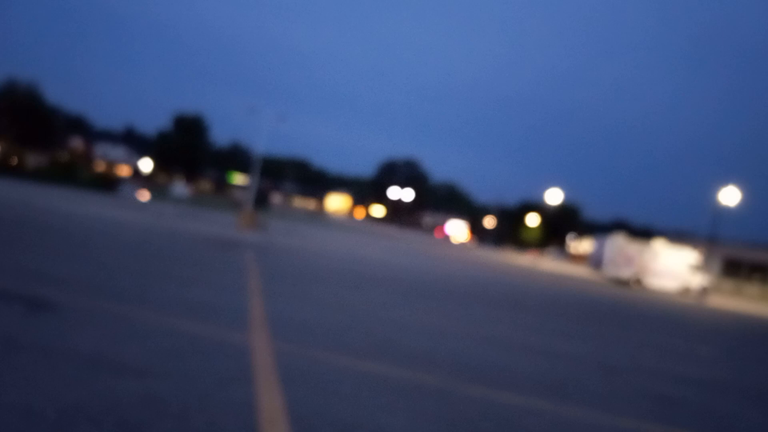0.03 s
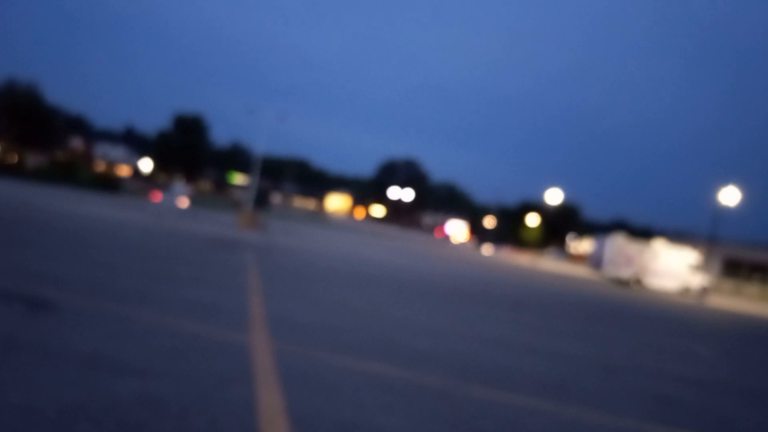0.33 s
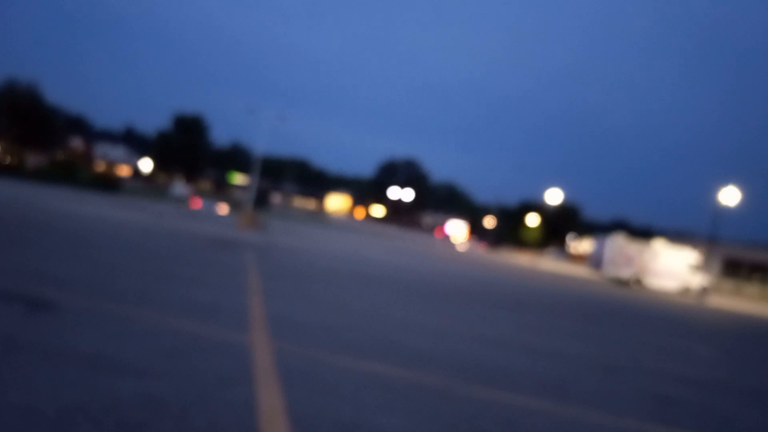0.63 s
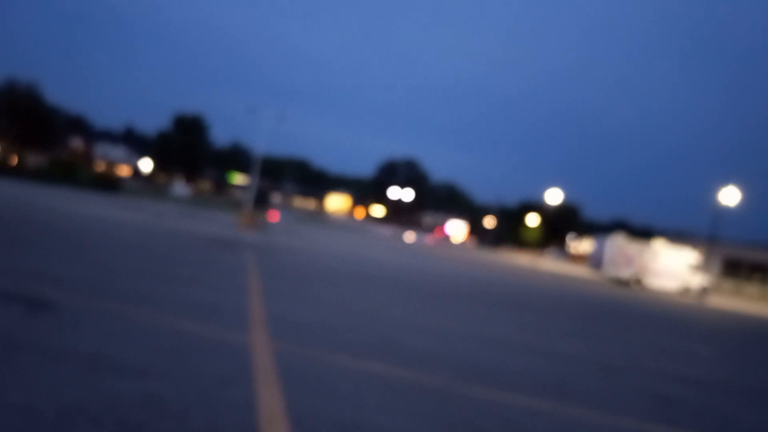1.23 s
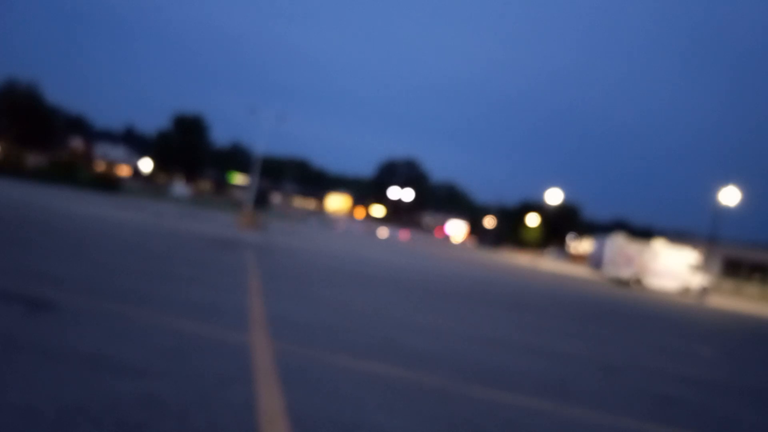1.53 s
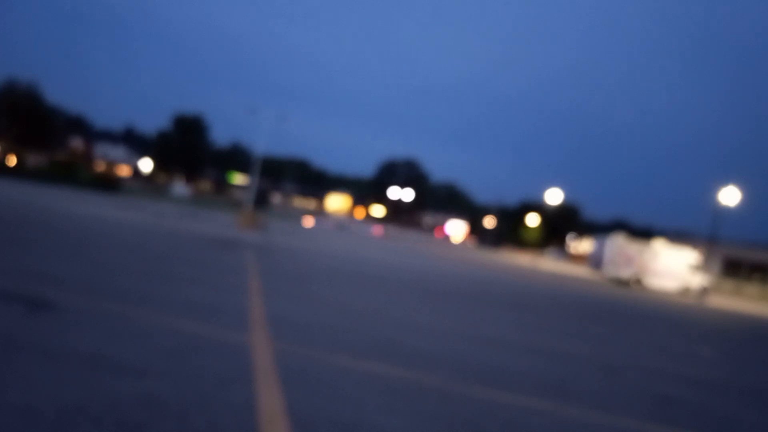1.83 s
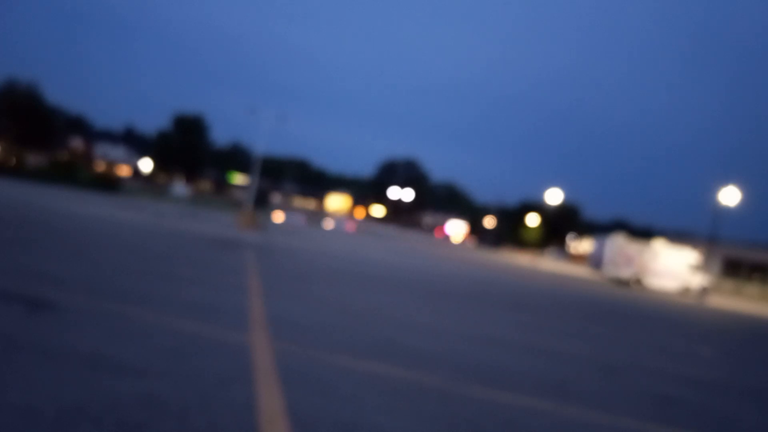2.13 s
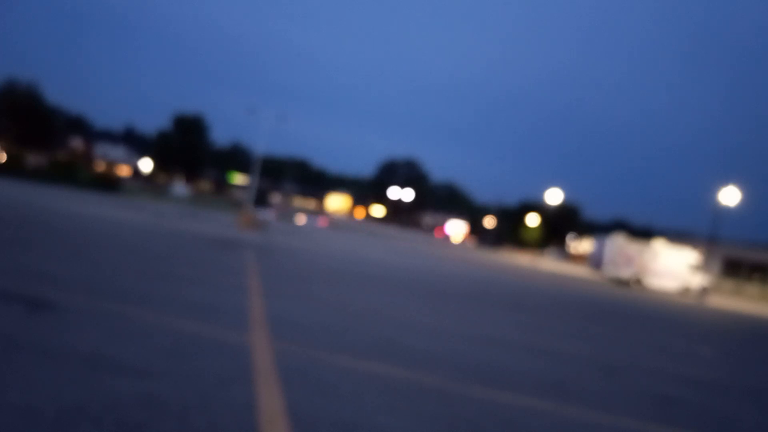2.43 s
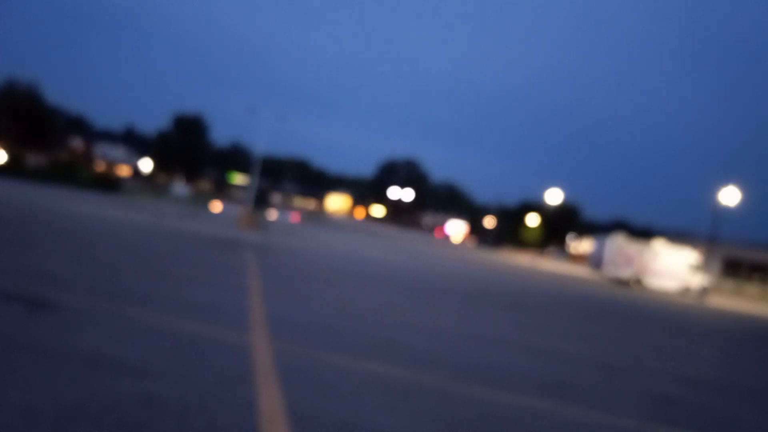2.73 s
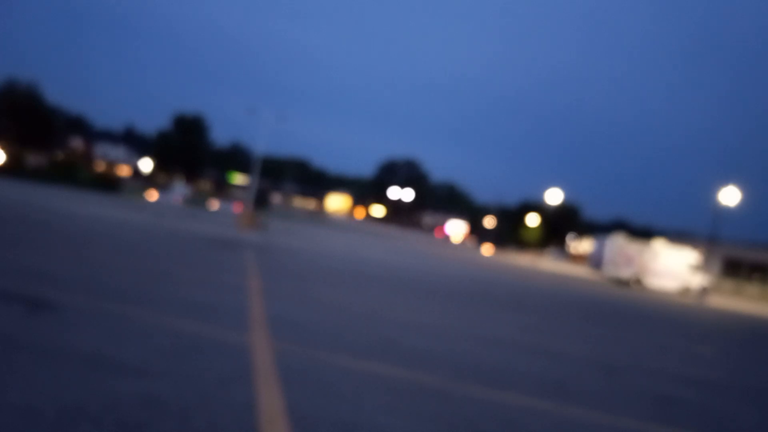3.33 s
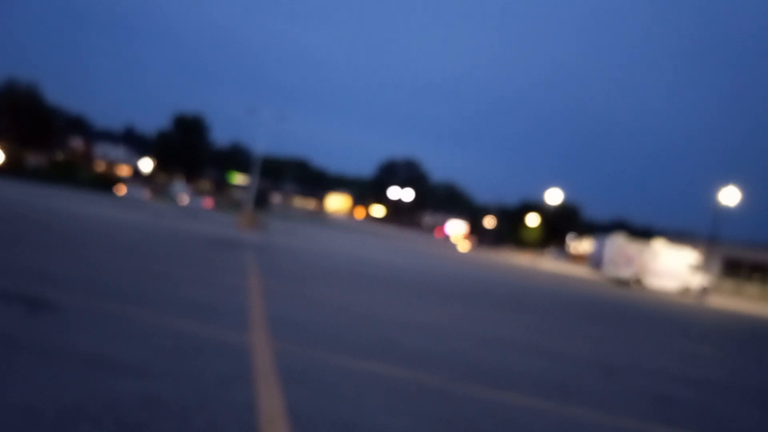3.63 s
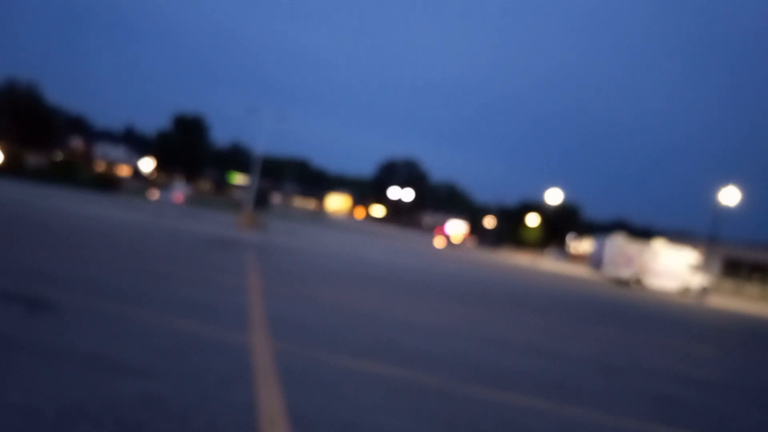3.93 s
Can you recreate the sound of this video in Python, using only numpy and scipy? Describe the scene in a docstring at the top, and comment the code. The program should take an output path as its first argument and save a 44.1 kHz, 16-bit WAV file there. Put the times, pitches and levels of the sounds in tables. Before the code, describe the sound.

An air horn sounds across a wide car park. At first there is only faint distant traffic and microphone hiss. At about 2.5 seconds the horn starts a held four-note chord, slightly sharp before settling, with rushing air and dull sputtering pops. At about 3.6 seconds it jumps abruptly louder and steadier, holding until the end at around 4 seconds. Nearly everything is in the left channel.

```python
"""Air horn across a car park

Dusk, a wide car park: faint far traffic under the microphone's hiss, then a four-bell air horn from across
the way. Air drives a diaphragm in each bell; the chord starts slightly sharp, settles and sputters. Then
its sound steps up abruptly, as at an edit or gain jump. Nearly everything arrives in the left channel."""
import sys
import numpy as np
from scipy import signal
from scipy.fft import rfft, irfft
from scipy.io import wavfile
from scipy.ndimage import uniform_filter1d, minimum_filter1d

SR = 44100
rng = np.random.default_rng(int(sys.argv[2]) if len(sys.argv) > 2 else 0)


def master(y):
    """Save y as 16-bit WAV."""
    cut = np.clip(np.atleast_2d(y).T, -1, 1)
    pcm = np.round(cut * 32767)  # scale
    wavfile.write(sys.argv[1], SR, pcm.astype(np.int16))


N = 176400

VALVE_OPEN_S, STEP_UP_S = 2.499, 3.5775   # the quiet part lies between these, the loud part follows
TOP_CUT_HZ = 15700

# Spectrum of the far traffic: f/Hz, density/(dB per Hz)
TRAFFIC_SPECTRUM = [(30, -128), (60, -129), (95, -107), (220, -118), (290, -92), (430, -91.5), (600, -103),
                    (900, -108), (1300, -113), (2800, -115)]
# Swell and ebb of that traffic: t/s, level/dB (-75 is unity gain)
TRAFFIC_SWELL = [(0.06, -82.5), (0.28, -82), (0.43, -70), (0.74, -78), (0.88, -71.5), (1.06, -79),
                 (1.32, -73.5), (1.58, -81), (1.86, -76), (1.98, -79), (2.08, -77), (2.45, -77.5)]
# Microphone hiss: f/Hz, density/(dB per Hz)
MIC_HISS = [(3000, -114), (3800, -100), (6500, -100), (7400, -102), (8800, -101), (9800, -105),
            (12500, -105), (15400, -110)]
# Rumble in the right channel: f/Hz, density/(dB per Hz)
RIGHT_RUMBLE = [(30, -118), (55, -104), (80, -98), (120, -106), (220, -118), (1000, -128)]
# The four bells: quiet f/Hz, loud f/Hz, quiet level/dB relative to loud, wander/fraction of pitch
HORN_BELLS = [(275.9, 275.1, -20.5, 0.000492), (319.8, 320.05, -17, .0005), (378.4, 378.4, -15, .0007),
              (489.3, 492.3, -13.5, .0013)]
# Harmonics in the loud part: harmonic number, then level/dB for each of the four bells
BELL_HARMONICS = [(1, -22.5, -11, -11.5, -12.5), (2, -37, -13, -19.5, -34.5), (3, -28.5, -37, -42.5, -53),
                  (4, -37.5, -42.5, -37.5, -55), (5, -38.5, -42.5, -42.5, -58), (6, -50, -43, -46, -56),
                  (7, -42, -45.5, -43, -63), (8, -45, -42.5, -49, -65), (9, -51, -40, -46.5, -74),
                  (10, -37, -42, -46, -51.5), (11, -32, -42.5, -55, -75), (12, -37.5, -40.5, -47.5, -70),
                  (13, -39, -42.5, -50, -65), (14, -42.5, -64, -49.5, -75), (15, -52, -47, -52, -74),
                  (16, -64, -47.5, -51, -58), (17, -49.5, -60, -75, -74), (18, -68, -52, -67, -74)]
# Where each bell's roll-off starts, beyond the listed harmonics: level/dB
ROLLOFF_START_DB = [-65, -53.5, -65.5, -78]
# Weak tones beside the chord: f/Hz, loud level/dB, quiet level/dB relative to loud
FAINT_TONES = [(132.6, -43, -6), (191.0, -46, -4), (435.0, -30, -15), (549.5, -38, -5), (710.8, -39, -15)]
# Air rushing through the bells: f/Hz, quiet density/(dB per Hz), loud density/(dB per Hz)
AIR_SPECTRA = [(30, -98, -84), (81, -76, -58.5), (206, -73, -62), (290, -63.5, -48), (436, -57, -48),
               (590, -68.5, -51), (847, -66, -61.5), (1190, -82, -74), (1600, -78.5, -70), (2130, -88, -78),
               (2620, -82, -71.5), (3020, -79, -67), (4200, -88, -78.5), (5030, -87.5, -75),
               (5950, -90, -82.5), (7100, -92.5, -84.5), (8400, -88.5, -78.5), (9800, -99, -94.5),
               (11000, -95.5, -86), (12900, -94, -85), (15800, -103, -95)]
# The strongest pops of the sputter: t/s, peak level/dB
STRONG_POPS = [(2.535, -24), (2.551, -30), (2.572, -23), (2.635, -27), (2.673, -12), (2.78, -19),
               (2.883, -24), (3.084, -15), (3.116, -18.5), (3.148, -16.5), (3.799, -8.5), (3.835, -10)]
# Swell and ebb of the horn's treble: t/s, gain/dB
TREBLE_SWELL = [(2.55, -2), (2.7, -.5), (2.97, 1.5), (3.1, 0.5), (3.3, -1), (3.57, -2), (3.6, -1.5),
                (3.72, 0.5), (3.86, 1.5), (4.0, -.5)]


def from_db(db):
    return 10 ** (np.asarray(db) / 20)


def unit_rms(x):
    return x / np.sqrt(np.mean(x ** 2) + 1e-20)


def seconds():
    return np.arange(N) / SR


def ramp(start_s, length_s):
    """Rises from 0 to 1 and stays."""
    return np.clip((seconds() - start_s) / length_s, 0, 1)


def blend(quiet, loud, step_up):
    """The quiet value at step_up = 0, the loud value at step_up = 1."""
    return quiet + (loud - quiet) * step_up


def butter(order, hz, kind):
    return signal.butter(order, hz, kind, fs=SR, output="sos")


def drift(rate_hz):
    """Smooth random wavering with a spread of 1."""
    hop, run_in = 40, 2000
    pole = np.exp(-2 * np.pi * rate_hz * hop / SR)
    white = rng.standard_normal(N // hop + run_in + 2)
    slow = signal.lfilter([1], [1, -2 * pole, pole * pole], white)[run_in:]
    return np.interp(np.arange(N) / hop, np.arange(len(slow)), unit_rms(slow))


def noise(spectrum):
    """Noise shaped by rows of f/Hz, density/(dB per Hz)."""
    hz, db = np.transpose(spectrum)
    bins_hz = np.maximum(np.fft.rfftfreq(N, 1 / SR), 1)
    gain = from_db(np.interp(np.log(bins_hz), np.log(hz), db))
    return irfft(rfft(rng.standard_normal(N)) * gain, N) * np.sqrt(SR / 2)


def far_traffic():
    """Traffic a long way off: a dull wash that swells and ebbs."""
    swell = from_db(np.interp(seconds(), *np.transpose(TRAFFIC_SWELL)) + 75)
    return signal.sosfilt(butter(2, 1200, "low"), swell * noise(TRAFFIC_SPECTRUM))


def microphone_hiss():
    """The microphone's own noise: a steady midrange floor under slightly flickering hiss."""
    white = from_db(-115) * np.sqrt(SR / 2) * rng.standard_normal(N)
    floor = signal.sosfilt(butter(1, [500, 3000], "band"), white)
    flicker = from_db(0.84 * drift(32))
    return floor + flicker * signal.sosfilt(butter(4, 2800, "high"), noise(MIC_HISS))


def right_channel_floor():
    """A trace of rumble and hiss on the right side."""
    return from_db(0.5) * noise(RIGHT_RUMBLE) + from_db(-50) * noise(MIC_HISS)


def diaphragm_phase(quiet_hz, loud_hz, wander, step_up):
    """A diaphragm's cycle: it overshoots in pitch as the air arrives; less jitter in the loud part."""
    overshoot = 0.021 * np.exp(-((seconds() - 2.57) / 0.07) ** 2)
    jitter = blend(0.003, 0.00099, step_up) * drift(50)
    pitch_hz = blend(quiet_hz, loud_hz, step_up) * (1 + overshoot + wander * drift(2.965) + jitter)
    return 2 * np.pi * (np.cumsum(pitch_hz) / SR + rng.random())


def bell(phase, loud_hz, harmonics_db, rolloff_db, step_up):
    """One diaphragm and its flare: harmonics flutter in the quiet part, steadier in the loud part."""
    age_s = np.maximum(seconds() - VALVE_OPEN_S, 0)
    brighten = (1 - np.exp(-age_s / 0.049)) ** 2   # the overtones swell in after the valve opens
    sheen = from_db(1.5 * (1 - step_up))
    low_depth_db, upper_depth_db = blend(2.75, 0.25, step_up), blend(5.5, 0.5, step_up)
    low_flutter = [from_db(low_depth_db * drift(15)) for _ in range(2)]
    upper_flutter = [from_db(upper_depth_db * np.minimum(drift(18), 2) - 1.5 * (1 - step_up))
                     for _ in range(9)]
    tone, listed = np.zeros(N), len(harmonics_db)
    for k, (scatter, shift) in enumerate(rng.standard_normal((56, 2)), 1):
        hz = k * loud_hz
        if hz > TOP_CUT_HZ:
            break
        if k <= listed:
            db = harmonics_db[k - 1]
        else:
            db = rolloff_db - 14.5 * np.log2(k / listed) + 4 * scatter   # falls 14.5 dB per octave
        flutters = upper_flutter if hz > 800 else low_flutter
        gain = from_db(db) * flutters[k % len(flutters)]
        if hz > 700:
            gain *= brighten
        if hz > 4200:
            gain *= sheen
        tone += gain * np.cos(k * phase + 1.04 * shift)   # scattered phases blunt each cycle's pulse
    return tone


def side_tones(step_up):
    """Faint wavering tones below, between and above the notes of the chord."""
    tones = np.zeros(N)
    for hz, db, quiet_db in FAINT_TONES:
        phase = 2 * np.pi * np.cumsum(hz * (1 + 0.0044 * drift(11.4))) / SR
        tones += from_db(db + quiet_db * (1 - step_up) + 2.3 * drift(3.5)) * np.sin(phase)
    return tones


def sputter(step_up):
    """The horn sputters on its air: dense dull pops in the quiet part, and a dozen strong ones."""
    pops_per_s = 130
    sizes = from_db(3.5 * np.minimum(rng.exponential(1, N), 2))
    small_kicks = sizes * (rng.random(N) < pops_per_s / SR)
    strong_kicks = np.zeros(N)
    for at_s, db in STRONG_POPS:
        strong_kicks[int(at_s * SR)] = from_db(db)
    dull_band = np.vstack([butter(2, [305, 600], "band"), butter(4, [250, 1100], "band")])
    pop = signal.sosfilt(dull_band, signal.unit_impulse(SR // 20))
    small = from_db(-31) * unit_rms(signal.fftconvolve(small_kicks, pop)[:N])
    strong = signal.fftconvolve(strong_kicks, pop / np.abs(pop).max())[:N]
    return small * (1 - step_up) + strong


def flicker_bands(sound):
    """Each narrow band between 750 and 7000 Hz flickers on its own."""
    bins_hz, spectrum = np.fft.rfftfreq(N, 1 / SR), rfft(sound)
    centres_hz = np.geomspace(750, 7000, 18)
    bands = [np.interp(bins_hz, centres_hz, row) for row in np.eye(len(centres_hz))]
    result = irfft(spectrum * (bands[0] + bands[-1]), N)   # both ends stay steady
    for band in bands[1:-1]:
        result += irfft(spectrum * band, N) * unit_rms(from_db(3.5 * drift(16)))
    return result


def air_rush(phases, step_up):
    """Air rushes through the bells, its treble chopped by the three lowest diaphragms."""
    spectra = np.array(AIR_SPECTRA)
    quiet = from_db(drift(19) - 1.5) * flicker_bands(noise(spectra[:, [0, 1]]))
    loud = from_db(0.5 * drift(11)) * noise(spectra[:, [0, 2]])
    rush = blend(quiet, loud, step_up)
    treble = signal.sosfiltfilt(butter(2, 2000, "high"), rush)
    chop = unit_rms(1 + 0.31 * sum(np.cos(phase) for phase in phases[:-1]))
    return (rush + treble * (chop - 1)) * ramp(VALVE_OPEN_S + 0.02, 0.034)


def air_horn():
    """Four bells on one air supply, heard across the car park; their treble swells and ebbs a little."""
    step_up = ramp(STEP_UP_S, length_s=0.003)   # abrupt, as at an edit or gain jump
    harmonics = np.transpose(BELL_HARMONICS)[1:]
    chord, phases = np.zeros(N), []
    for i, (quiet_hz, loud_hz, quiet_db, wander) in enumerate(HORN_BELLS):
        phase = diaphragm_phase(quiet_hz, loud_hz, wander, step_up)
        tone = bell(phase, loud_hz, harmonics[i], ROLLOFF_START_DB[i], step_up)
        chord += tone * from_db(quiet_db * (1 - step_up))
        phases.append(phase)
    sound = chord + side_tones(step_up) + air_rush(phases, step_up) + sputter(step_up)
    treble = signal.sosfiltfilt(butter(2, 1800, "high"), sound)
    treble_gain = from_db(np.interp(seconds(), *np.transpose(TREBLE_SWELL)))
    attack = ramp(VALVE_OPEN_S, length_s=0.039) ** 1.43
    return (sound + treble * (treble_gain - 1)) * attack


def scene():
    """At the microphone: traffic, hiss and horn on the left, barely a trace of the horn on the right."""
    background = np.array([far_traffic() + microphone_hiss(), right_channel_floor()])
    horn = air_horn()
    return background * ramp(0.035, 0.018) + np.array([horn, from_db(-59) * horn])


def record(dry):
    """The recorder thins the deepest bass, limits the highest peaks, tapers the end and cuts the top."""
    thinned = signal.sosfilt(butter(1, 30, "high"), dry)
    span = int(0.003 * SR)   # a 3 ms limiter window
    allowed_gain = 1 / np.maximum(np.abs(thinned), 1)
    limited = thinned * uniform_filter1d(minimum_filter1d(allowed_gain, span), span)
    end_taper = ramp(0, 0.002)[::-1]
    top_cut = signal.ellip(12, 0.1, 80, TOP_CUT_HZ, fs=SR, output="sos")
    return signal.sosfilt(top_cut, limited * end_taper)


dry = scene()
out = record(dry)
master(out)
```